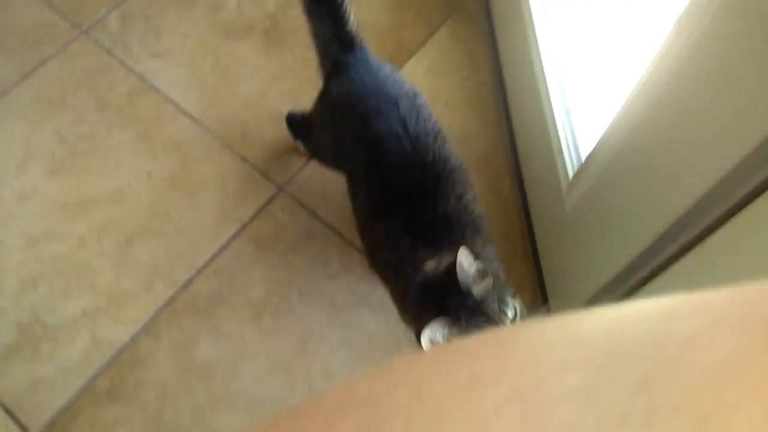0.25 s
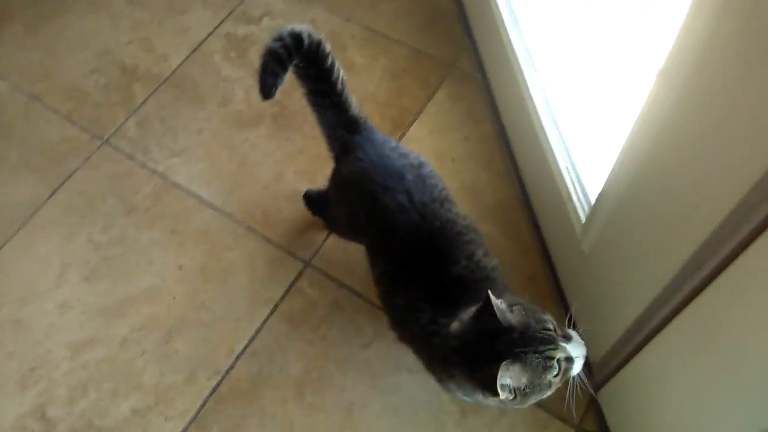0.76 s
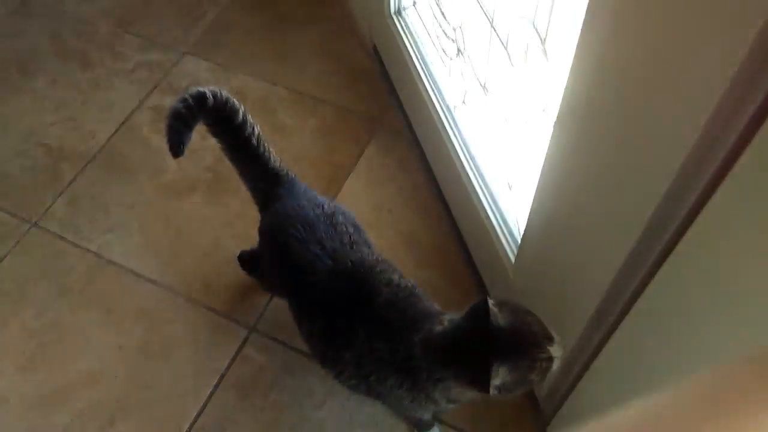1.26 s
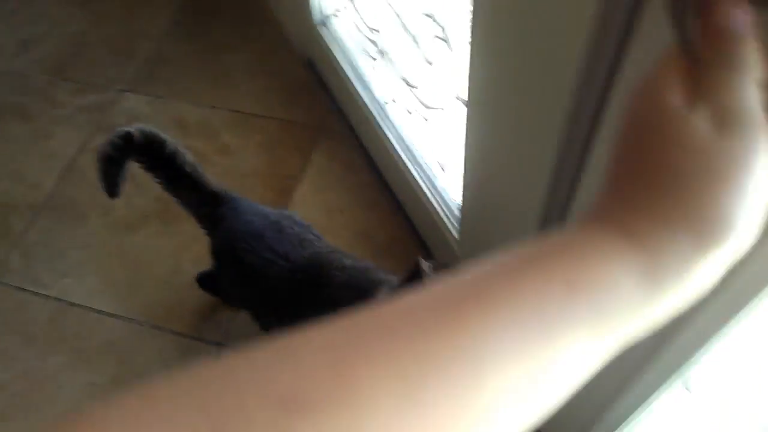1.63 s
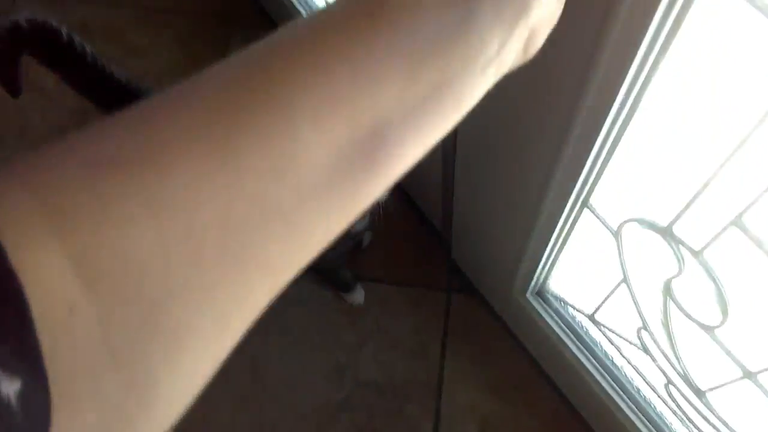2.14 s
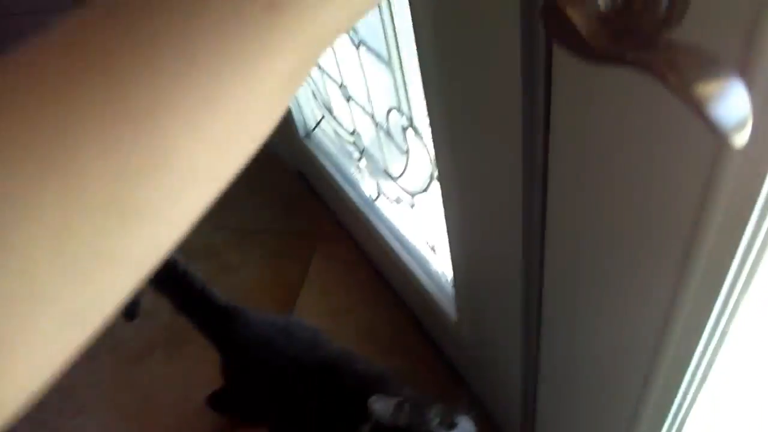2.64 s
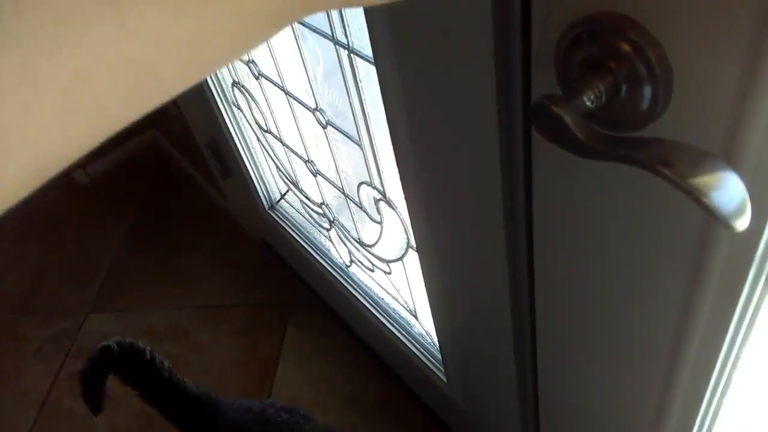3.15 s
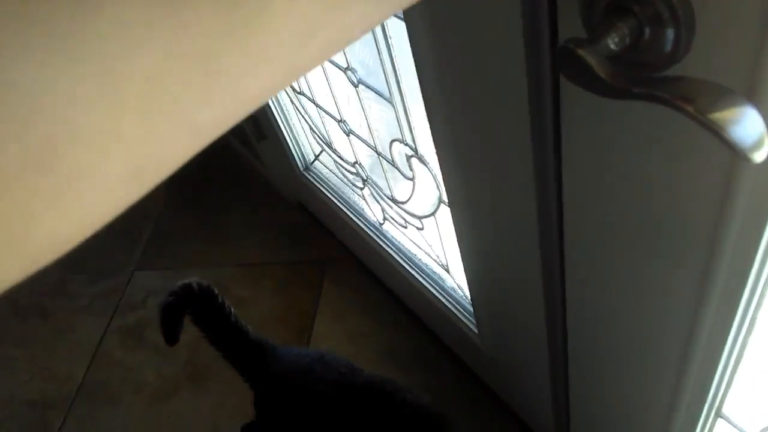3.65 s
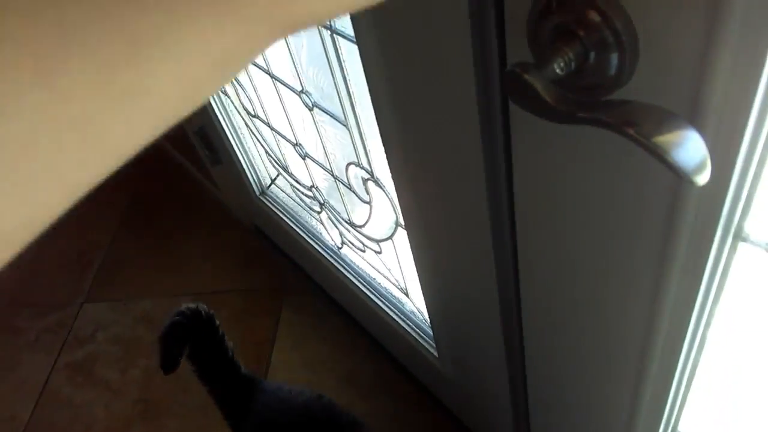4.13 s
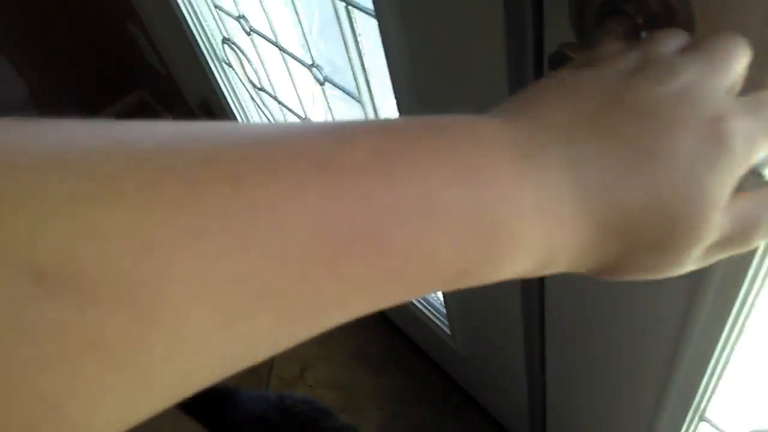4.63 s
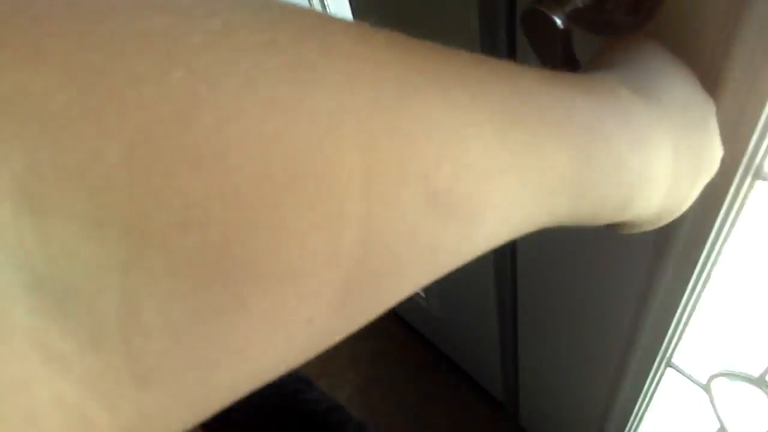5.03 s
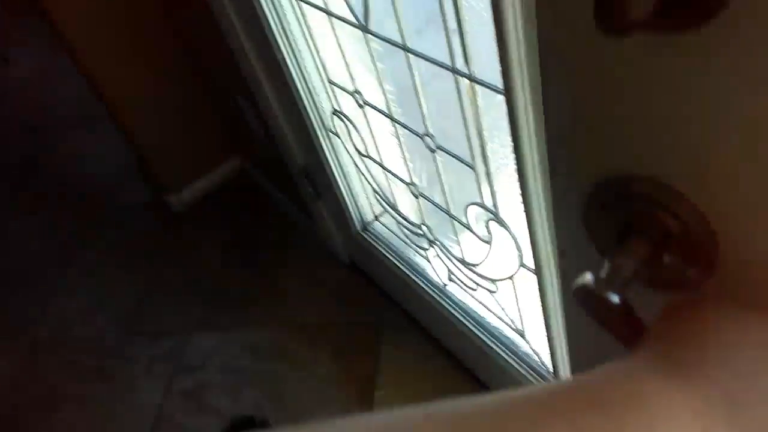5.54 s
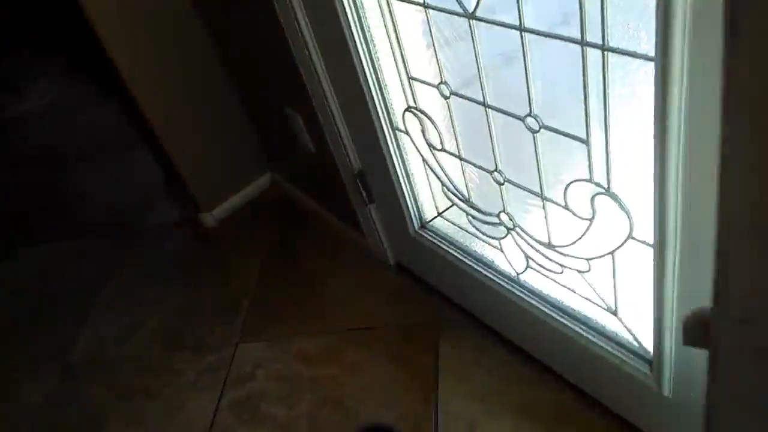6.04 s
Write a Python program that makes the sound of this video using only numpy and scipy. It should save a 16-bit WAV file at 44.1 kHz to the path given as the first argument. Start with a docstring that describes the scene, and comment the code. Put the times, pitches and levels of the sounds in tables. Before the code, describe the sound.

A door's lock and lever clack and rattle in bursts, a bolt snaps hard, then the door pulls open with a brief rubbery squeal.

```python
"""Front door unlocked and opened

A glazed front door is unlocked and opened in a tiled hall, an arm's length from a small microphone.
Lock, bolt and lever click, chirp and thump the leaf: noise bursts into resonators, gliding sines, decaying modes.
The door then drags off its weather strip, which rasps (filtered random clicks) and squeals (swaying partials).
The hall rings after every blow (noise reverb), over still air, a low household hum and a rumble (filtered noise).
"""
import sys
import numpy as np
from scipy import signal
from scipy.fft import rfft, irfft
from scipy.io import wavfile

SR = 44100
rng = np.random.default_rng(int(sys.argv[2]) if len(sys.argv) > 2 else 0)


def output_pcm(signal):
    """Save a mono or channel-first signal as 16-bit PCM at the path in sys.argv[1].

    Samples are clipped to [-1, 1] before scaling.
    """
    pcm = np.clip(np.atleast_2d(signal).T, -1, 1) * 32767
    wavfile.write(sys.argv[1], SR, np.round(pcm).astype(np.int16))


N = 277124
TIME = np.arange(N) / SR
TOP_HZ = 14200

# still air spectrum: (frequency [Hz], relative level [dB])
AIR_COLOUR = [(15, -47.5), (25, -14), (91, -15.5), (107, 0.5), (126, -0.5), (164, -11.5), (189, -18.5),
              (229, -4), (298, -27), (426, -27.5), (719, -33.5), (981, -27), (1130, -38.5), (2670, -32),
              (7430, -43.5), (9660, -87.5), (16300, -120)]
# household hum: (frequency [Hz], mean level [dB])
HUM = [(98, -84), (120, -78), (229, -74.5)]
# low rumble, before trim: (time [s], level [dB])
RUMBLE = [(.1, -53.5), (.3, -58), (2.72, -57.5), (3.15, -66), (4.6, -68.5), (6.28, -72.5)]
# rumble spectrum: (frequency [Hz], relative level [dB])
RUMBLE_COLOUR = [(20, -28), (40, -22), (80, -5), (125, 1.5), (240, -1.5), (350, -9.5), (600, -19.5),
                 (1500, -23.5), (4000, -45.5), (9000, -79)]
# blows of lock, bolt and lever, levels before trim:
# (time [s], metal clack [dB], case and leaf body [dB], bright tick [dB], basic contact t60 [s])
BLOWS = [(0.2322, -55.5, -67, -58.5, 0.03), (0.2611, -49, -58, -62.5, 0.021),
         (0.5293, -33.5, -48, -53, 0.02), (.614, -42.5, -54, -63, 0.085),
         (0.6407, -35.5, -51, -57.5, 0.034), (0.7174, -35.5, -56.5, -58.5, 0.036),
         (.838, -36, -46.5, -61.5, 0.024), (0.8763, -40.5, -50, -57, 0.051),
         (0.9149, -36.5, -45.5, -55, 0.031), (0.9333, -33, -58.5, -47, 0.018),
         (0.9434, -47, -45, -68, 0.011), (0.9636, -38.5, -49, -67, 0.012), (1.038, -43.5, -79, -63.5, .017),
         (1.0881, -41, -53, -61.5, .015), (1.3196, -40, -56.5, -49, 0.014), (1.3625, -47, -60, -85, 0.022),
         (1.407, -48.5, -62, -81, 0.022), (1.518, -53.5, -49, -70.5, 0.021),
         (1.568, -35.5, -44.5, -55, .03), (1.6886, -45.5, -50.5, -71, .04),
         (1.7124, -62, -55, -63.5, 0.017), (1.9467, -55.5, -53, -76, 0.054),
         (1.9735, -37.5, -47.5, -49.5, 0.032), (2.0515, -40.5, -44.5, -57.5, .02),
         (2.1304, -29.5, -43, -39, 0.066), (2.1388, -33, -42, -45.5, .028),
         (2.2564, -52, -54.5, -84, 0.022), (2.4293, -28.5, -45, -39.5, .023),
         (2.4544, -37, -48.5, -65, .01), (2.5724, -22.5, -44, -45.5, 0.1),
         (2.6084, -28.5, -39, -51.5, 0.066), (2.6211, -27, -41, -43.5, .077),
         (2.6285, -30.5, -42.5, -49, 0.027), (2.6487, -37, -57, -58.5, 0.0091),
         (2.9158, -32.5, -47, -51.5, 0.025), (2.974, -56, -53.5, -76.5, 0.031),
         (3.6315, -62.5, -57.5, -87, 0.081), (3.6709, -54, -57, -82, 0.041),
         (3.7953, -56.5, -66, -72.5, 0.051), (3.812, -50, -69, -84, 0.039),
         (3.921, -41.5, -56.5, -83, 0.037), (3.9286, -38, -60.5, -72.5, 0.017),
         (4.01, -41, -61, -76.5, 0.11), (4.0491, -42, -55.5, -69, 0.047), (4.0637, -34, -48, -56, 0.047),
         (4.0754, -39.5, -50, -63, .03), (5.0316, -39.5, -51.5, -63, 0.039),
         (5.0641, -36.5, -52.5, -50.5, 0.075), (5.1418, -48, -51.5, -82.5, 0.038),
         (5.4162, -45, -54, -65, .034), (5.4692, -41.5, -60, -52, 0.024), (5.5127, -45, -55.5, -60, 0.081),
         (5.6125, -33.5, -50, -67, 0.044), (5.6756, -36.5, -57, -51, .05),
         (5.9211, -52.5, -55.5, -83, 0.017), (6.1568, -47, -62, -65, 0.035),
         (6.1833, -43.5, -51.5, -73.5, .028)]
# lock case resonances: (frequency [Hz], width [Hz], relative level [dB])
CASE = [(572, 93, 3.5), (734, 130.3, 4.5), (896, 240, 4), (1114, 250, 2.5), (1327, 290, 2)]
# bolt and lever resonances: (frequency [Hz], width [Hz], relative level [dB])
BOLT = [(1555, 180, 2), (1900, 180, 7), (2210, 310, 5), (2446, 190, 0), (2800, 453, -12)]
# small-part resonances: (frequency [Hz], width [Hz], relative level [dB])
SMALL_PARTS = [(3500, 2200, 0.5), (4750, 2300, 4.5), (6150, 1100, 5.5), (7300, 1900, 3), (9200, 6900, -7)]
# door leaf modes: (frequency [Hz], relative level [dB], t60 [s])
DOOR = [(125.8, -8.5, 0.2), (206, -6, .25), (232, 3.5, 0.32), (261.6, -1, .3), (286.2, 4, 0.2),
        (318, 3.5, 0.17), (378.3, 1, 0.086), (460, -15.5, 0.0751)]
# rubs of bolt and weather strip, levels before trim:
# (time [s], hold [s], level [dB], treble re level [dB], attack [s], release [s])
RUBS = [(0.327, .03, -85.5, 9.5, .1, 0.34), (0.568, 0.019, -62.5, -14, 0.035, 0.072),
        (0.651, 0.047, -50.5, -9, 0.025, .035), (0.713, 0.01, -48.5, -15, .02, 0.046),
        (0.88, 0.08, -59.5, -8, 0.041, .05), (1.49, .02, -61.5, -10, 0.046, .1),
        (1.711, .015, -58, -7, 0.066, .06), (2.424, .012, -52, -12, 0.018, .02),
        (5.014, 0.037, -73.5, -13, 0.12, .03), (5.426, .06, -53.5, -13, 0.095, 0.072),
        (5.48, 0.099, -53, 3, .015, .22), (6.143, .01, -69, -8.5, 0.024, 0.024)]
RUB_EDGE_DB = 18  # rise over the attack, fall over the release
# rub body spectrum: (frequency [Hz], relative level [dB])
RUBBER = [(100, -26), (200, -9), (320, -3.5), (480, 1), (850, -14), (1300, -4), (2100, -7.5), (3000, -18),
          (4200, -27), (8000, -78.5)]
# rub treble spectrum: (frequency [Hz], relative level [dB])
RUBBER_TOP = [(1500, -25.5), (2600, -10), (3500, 3), (4500, -9.5), (5600, 2), (6700, -6.5), (8000, -13),
              (11000, -5.5)]
# shoves that flex the door in its frame: (time [s], frequency [Hz], level [dB], t60 [s])
SHOVES = [(0.944, 228.3, -56, 0.35), (1.568, 232, -54.5, 0.24), (1.69, 93, -44.5, 0.26),
          (2.14, 116, -42.5, 0.45), (2.145, 163, -44, 0.25), (2.624, 117, -44, 0.46),
          (2.63, 173, -41.5, .3), (2.632, 318, -32.5, 0.19), (2.639, 256.2, -35.5, 0.24),
          (2.926, 259, -44.5, .3), (4.07, 247.4, -57, 0.33), (5.033, 325, -45, 0.29),
          (5.475, 321.6, -58, 0.54), (6.183, 300, -40.5, 0.15)]
# metal slipping on metal: (time [s], length [s], start [Hz], end [Hz], level [dB], roughness [0-1])
CHIRPS = [(1.3205, 0.0044, 8430, 7460, -38.5, 0.56), (1.713, 0.037, 4540, 5500, -64, 0.3),
          (2.4195, 0.0024, 6700, 6040, -50, 1), (2.4285, .002, 5950, 6250, -34, 0.75),
          (2.4308, 0.0039, 5500, 4000, -24, 0.15), (2.574, 0.0056, 1655, 1666, -29, 0.4),
          (2.58, 0.02, 1760, 1820, -38, 0.88), (2.62, 0.0088, 5960, 5760, -36, 0),
          (2.632, .008, 5980, 5690, -47.5, 0.3), (3.92, 0.0081, 1878, 1900, -41.5, 0.07),
          (3.926, 0.023, 1930, 1822, -42.5, 0.37), (4.0071, 0.0083, 1775, 1690, -40, 0.35),
          (5.066, 0.0024, 8600, 6600, -32, 0.74), (6.157, 0.0038, 2136, 2070, -45, 0.08)]
# latch spring coils, ringing as the bolt snaps home:
# (time [s], centre [Hz], width [Hz], level before decay [dB], t60 [s])
SPRING = [(2.575, 2835, 463, -53.5, 0.73), (2.62, 5810, 258, -57.5, .6), (2.916, 2800, 465, -62, 0.48)]
# squeal glide, first touch to clear of the strip: (time [s], pitch before sway [Hz])
SQUEAL = [(5.51, 1883), (5.581, 1758), (5.635, 1953), (5.7, 2053), (5.755, 2277), (5.79, 2040),
          (5.94, 1934)]
# squeal partials: (full-pressure level before trim [dB], growth [dB per dB of pressure], phase wander [rad])
PARTIALS = [(-50.5, 0.86, 0.92), (-52, 1.8, .2), (-46, 2.5, .12)]
# flapping strip lip: sway rate, share of the pitch, time of the greatest crest, spread around it
SWAY_HZ, SWAY_SHARE, SWAY_CREST_S, SWAY_SPREAD_S = 17.6, 0.0783, 5.635, 0.0935
# pressure on the strip: builds, holds while the door's edge passes, ebbs
PRESS_S, PRESS_HOLD_S, PRESS_RISE_DB_PER_S, PRESS_EBB_DB_PER_S = 5.577, 0.061, 103.5, 61
SQUEAL_TOP_HZ = 6600  # partials fall away steeply above
# hall decay: (band centre [Hz], t60 [s])
HALL = [(125, 0.35), (300, 0.61), (900, .7), (2200, 0.67), (5000, 0.56), (9000, 0.4)]
# microphone response: (frequency [Hz], gain [dB])
MICROPHONE = [(6700, 0), (7300, -8), (7900, -18), (8800, -16), (9600, -17.5), (10400, -32.5), (12000, -42)]
# hiss spectrum: (frequency [Hz], relative level [dB])
HISS = [(1500, -20), (4000, -16), (7000, -1), (9000, 2.5), (10500, -1.5), (14000, -3)]


def undb(db):
    """Decibels to gain."""
    return 10 ** (np.asarray(db) / 20)


def unit(x):
    """Scale to rms 1."""
    return x / np.sqrt(np.mean(x ** 2) + 1e-30)


def curves(table):
    """Columns of a table, joined by straight lines in time."""
    s, *columns = np.transpose(table)
    return [np.interp(TIME, s, c) for c in columns]


def fade(t, t60):
    """Exponential decay, 60 dB in t60."""
    return np.exp(-np.log(1000) * t / max(t60, 1e-3))


def gate(s, hold, rise_db_per_s, fall_db_per_s):
    """Attack, hold and release in dB; 0 while it holds, -200 at least."""
    rise_db = (TIME - s) * rise_db_per_s
    fall_db = (s + hold - TIME) * fall_db_per_s
    return np.maximum(np.minimum(np.minimum(rise_db, fall_db), 0), -200)


def walk(rate_hz, size=N):
    """Smooth chance with spread near 1: random points joined by lines."""
    steps = np.arange(size) * rate_hz / SR
    count = int(steps[-1]) + 2
    return np.interp(steps, np.arange(count), rng.standard_normal(count))


def add(track, s, sound):
    """Mix a sound into a track at time s."""
    i = max(int(s * SR), 0)
    track[i:i + len(sound)] += sound[:N - i]


def spectrum_gain(size, points):
    """Gain per FFT bin, interpolated over log frequency."""
    hz, db = np.transpose(points)
    f = np.maximum(np.fft.rfftfreq(size, 1 / SR), 1)
    return undb(np.interp(np.log(f), np.log(hz), db))


def colour(x, points):
    """Zero-phase filter by a spectrum table; rms 1."""
    return unit(irfft(rfft(x) * spectrum_gain(len(x), points), len(x)))


def shape(x, points):
    """Filter by a spectrum table through a short minimum-phase response."""
    cepstrum = irfft(np.log(spectrum_gain(1024, points)))
    half = len(cepstrum) // 2
    # fold to causal
    cepstrum[1:half] *= 2
    cepstrum[half + 1:] = 0
    return signal.fftconvolve(x, irfft(np.exp(rfft(cepstrum))))[:N]


def band(x, lo_hz, hi_hz, order=3):
    """Causal band-pass."""
    sos = signal.butter(order, [lo_hz, min(hi_hz, SR / 2 - 1)], "band", fs=SR, output="sos")
    return signal.sosfilt(sos, x)


def resonate(x, modes, detune=0.044, scatter_db=2):
    """Parallel resonances; each point of contact weights and loads them a little differently."""
    chance = rng.standard_normal((len(modes), 2))
    out = 0
    for k, ((hz, width_hz, db), (weight, load)) in enumerate(zip(modes, chance)):
        b, a = signal.iirpeak(hz * np.exp(detune * load), hz / width_hz, fs=SR)
        out = out + (-1) ** k * undb(db + scatter_db * weight) * signal.lfilter(b, a, x)
    return out


def per_blow(x, span_s=0.016):
    """Give each row the energy of rms 1 lasting span_s."""
    return x / np.sqrt(np.sum(x ** 2, axis=-1, keepdims=True) / (span_s * SR))


def house(air_db=-68, rumble_db=-1.5, waver_db=2):
    """Still air, a wavering appliance hum and a low rumble that comes and goes."""
    air = colour(rng.standard_normal(N), AIR_COLOUR) * undb(air_db)
    hum = np.zeros(N)
    for hz, db in HUM:
        size = np.sqrt(2) * undb(db + waver_db * walk(1.5))
        hum += size * np.sin(2 * np.pi * hz * TIME + walk(4.5))
    level_db = curves(RUMBLE)[0] + rumble_db + waver_db * walk(16.0)
    rumble = colour(rng.standard_normal(N), RUMBLE_COLOUR) * undb(level_db)
    return air + hum + rumble


def lock(clack_db=-11, knock_db=-1, tick_db=1, snap=4.4, tick_share=1.0, knock_share=1.8, rise_s=0.00047):
    """Each blow is a snap and a brief chatter of loose metal that rings bolt, case and small parts."""
    t = np.arange(SR // 10) / SR
    s, clack, body, tick, t60 = np.transpose(BLOWS)

    def strike(modes, db, t60_share):
        """Ring one set of modes with every blow."""
        chatter = rng.standard_normal((len(s), len(t))) * (1 - np.exp(-t / rise_s))
        rings = []
        for noise, decay_s in zip(chatter, t60):
            contact = noise * fade(t, t60_share * decay_s) + snap * (t == 0)
            rings.append(resonate(contact, modes))
        limited = band(rings, modes[0][0] * 0.68, modes[-1][0] * 1.287, order=4)
        return undb(db)[:, None] * per_blow(limited)

    hits = strike(BOLT, clack + clack_db, 1)
    hits = hits + strike(CASE, body + knock_db, knock_share)
    hits = hits + strike(SMALL_PARTS, tick + tick_db, tick_share)
    out = np.zeros(N)
    for start, hit in zip(s, hits):
        add(out, start, hit)
    return out


def leaf_thuds(thud_db=-0.5, boom_t60=0.15, boom_db=-3, swell_s=0.0036):
    """Each blow shakes the leaf: its modes swell a little late, amid a dense boom of frame and glass."""
    t = np.arange(SR // 2) / SR
    modes = np.array([undb(db) * np.exp(2j * np.pi * hz * t) * fade(t, t60) for hz, db, t60 in DOOR])
    phases = np.exp(2j * np.pi * rng.random((len(BLOWS), len(DOOR))))
    leaf = (phases @ modes).imag
    boom = band(rng.standard_normal(leaf.shape) * fade(t, boom_t60), 180, 450, order=2)
    thuds = (per_blow(leaf) + undb(boom_db) * per_blow(boom)) * (1 - np.exp(-t / swell_s))
    out = np.zeros(N)
    for (s, _, db, *_), thud in zip(BLOWS, thuds):
        add(out, s, undb(db + thud_db) * thud)
    return out


def sliding(slips_per_s=3000, spread_db=4, patchy_db=3, rasp_db=-1.0, catches_per_s=80, catch_db=-7):
    """Dense, uneven stick-slip clicks where bolt and weather strip rub; bigger catches ring the lock."""
    rubs = np.array([undb(db + gate(s, hold, RUB_EDGE_DB / attack, RUB_EDGE_DB / release))
                     for s, hold, db, _, attack, release in RUBS])
    treble_gain = undb([row[3] for row in RUBS])[:, None]
    # rubs sum in power
    body = np.linalg.norm(rubs, axis=0)
    treble = np.linalg.norm(rubs * treble_gain, axis=0)
    slips = (rng.random(N) < slips_per_s / SR) * rng.standard_normal(N)
    slips = slips * undb(spread_db * rng.standard_normal(N))
    rasp = body * unit(shape(slips, RUBBER))
    rasp = rasp + treble * undb(patchy_db * walk(80)) * unit(shape(slips, RUBBER_TOP))
    grains = 0
    for modes in (CASE, BOLT):
        catches = (rng.random(N) < catches_per_s / SR) * rng.uniform(-0.76, 1, N)
        grains = grains + unit(band(resonate(catches, modes), modes[0][0] / 2, modes[-1][0]))
    return rasp * undb(rasp_db + patchy_db * walk(160)) + undb(catch_db) * body * grains


def shoves(swell_s=0.0051, uneven_db=3, wobble_rad=1.0):
    """The door flexes under a shove and gives a low, wobbling thump."""
    t = np.arange(SR // 2) / SR
    out = np.zeros(N)
    for s, hz, db, t60 in SHOVES:
        size = undb(db + uneven_db * walk(90, size=len(t))) * fade(t, t60) * (1 - np.exp(-t / swell_s))
        add(out, s, size * np.sin(2 * np.pi * hz * t + wobble_rad * walk(60, size=len(t))))
    return out


def chirps(wander=0.25, flutter_db=9):
    """Tight metal parts slip and sing for a few milliseconds; roughness jitters pitch and level."""
    out = np.zeros(N)
    for s, length_s, start_hz, end_hz, db, rough in CHIRPS:
        n = int(length_s * SR)
        hz = np.geomspace(start_hz, end_hz, n) * (1 + wander * rough * walk(690, size=n))
        flutter = undb(flutter_db * rough * walk(700, size=n))
        tone = np.sin(2 * np.pi * np.cumsum(hz) / SR) * flutter
        add(out, s, undb(db) * unit(tone * signal.windows.tukey(n, .3)))
    return out


def spring():
    """Many close modes of the coil, as decaying band noise, beat in a faint, long shimmer."""
    t = np.arange(SR) / SR
    out = np.zeros(N)
    for s, hz, width_hz, db, t60 in SPRING:
        shimmer = band(rng.standard_normal(SR), hz - width_hz / 2, hz + width_hz / 2, order=2)
        add(out, s, undb(db) * unit(shimmer) * fade(t, t60))
    return out


def squeal(jitter=0.008, flutter_db=4.0, level_db=-1, top_order=24, touch_s=0.022):
    """The strip sings on the door's edge: pitch glides and sways, pressure brings out upper partials."""
    pressure_db = gate(PRESS_S, PRESS_HOLD_S, PRESS_RISE_DB_PER_S, PRESS_EBB_DB_PER_S)
    t = TIME - SWAY_CREST_S
    sway = SWAY_SHARE * np.cos(2 * np.pi * SWAY_HZ * t) * np.exp(-.5 * (t / SWAY_SPREAD_S) ** 2)
    # the weaker the squeal, the less firmly it locks to its pitch
    looseness = np.clip(undb(-pressure_db), 1, 3)
    hz = curves(SQUEAL)[0] * (1 + sway)
    phase = 2 * np.pi * np.cumsum(hz * (1 + jitter * looseness * walk(700))) / SR
    out = np.zeros(N)
    for k, (db, growth, wander_rad) in enumerate(PARTIALS, 1):
        size = undb(db + level_db + growth * pressure_db + flutter_db * walk(450))
        size = size / np.hypot(1, (k * hz / SQUEAL_TOP_HZ) ** top_order)
        out += size * np.sin(k * phase + wander_rad * walk(500))
    to_edge_s = np.minimum(TIME - SQUEAL[0][0], SQUEAL[-1][0] - TIME)
    return out * np.clip(to_edge_s / touch_s, 0, 1)


def hall(x, early_db=-11, early_t60=0.075, late_db=-11.5, bass_db=3, gap_s=.004):
    """Quick reflections from door and tiles, then the diffuse ring, decaying by band."""
    t = np.arange(SR) / SR
    centres, t60s = np.transpose(HALL)
    edges = [40, *np.sqrt(centres[1:] * centres[:-1]), TOP_HZ]
    late = np.zeros(SR)
    for k, (lo, hi, t60) in enumerate(zip(edges, edges[1:], t60s)):
        boost = undb(bass_db * (k < 2))  # two lowest bands
        late += band(rng.standard_normal(SR), lo, hi) * fade(t, t60) * boost
    early = rng.standard_normal(SR) ** 3 * fade(t, early_t60)  # cubed: sparse spikes
    early = undb(early_db) * unit(early * (t > gap_s))
    late = undb(late_db) * unit(late * (t > 2 * gap_s))
    return signal.fftconvolve(x, (early + late) / np.sqrt(SR))[:N]


def scene(chirp_hall_db=-8, squeal_hall_db=1, lock_hall_db=-3.5):
    """The lock differs in each direction; its chirps beam ahead, the strip sings into the hall."""
    door = leaf_thuds() + shoves() + sliding() + spring()
    metal, strip = chirps(), squeal()
    direct = lock() + door + metal + strip
    # each lock() call draws its own chatter
    hall_feed = undb(lock_hall_db) * lock() + door
    hall_feed = hall_feed + undb(chirp_hall_db) * metal + undb(squeal_hall_db) * strip
    main_ring = hall(hall_feed)
    lock_ring = hall(undb(lock_hall_db) * lock())
    mono = shape(direct + main_ring + lock_ring, MICROPHONE) + house()
    return np.array([mono, mono])


def record(dry, hiss_db=-93, channel_noise_db=-97):
    """A faint coloured hiss, with a little independent noise in each channel; the top is cut."""
    hiss = undb(hiss_db) * colour(rng.standard_normal(N), HISS)
    noise = undb(channel_noise_db) * rng.standard_normal(dry.shape)
    top_cut = signal.ellip(8, .2, 70, TOP_HZ, fs=SR, output="sos")
    return signal.sosfilt(top_cut, dry + hiss + noise)


dry = scene()
out = record(dry)
output_pcm(out)
```